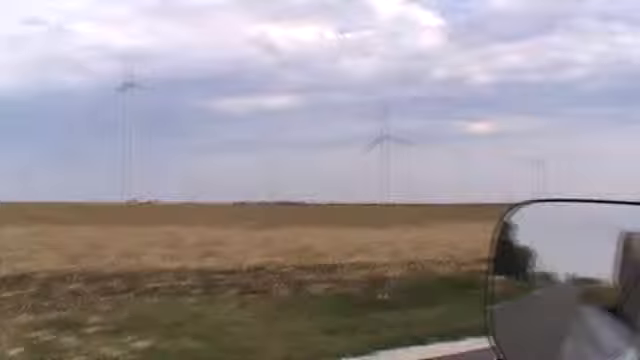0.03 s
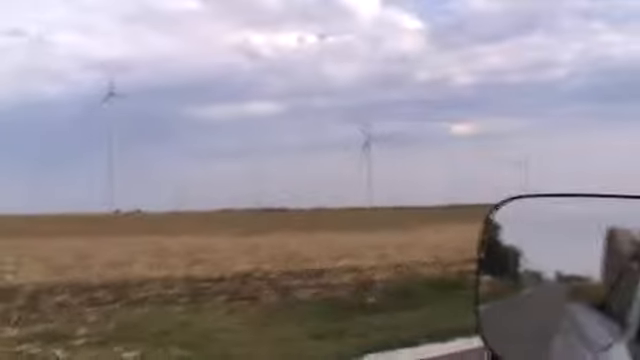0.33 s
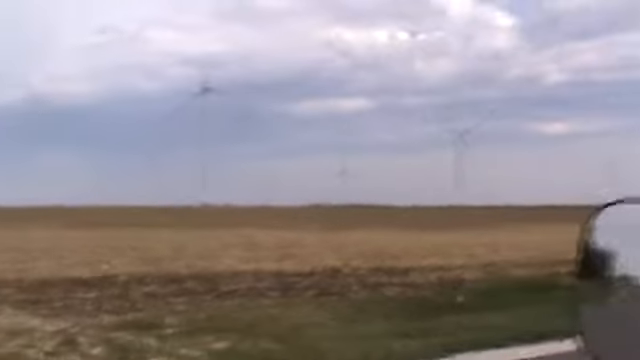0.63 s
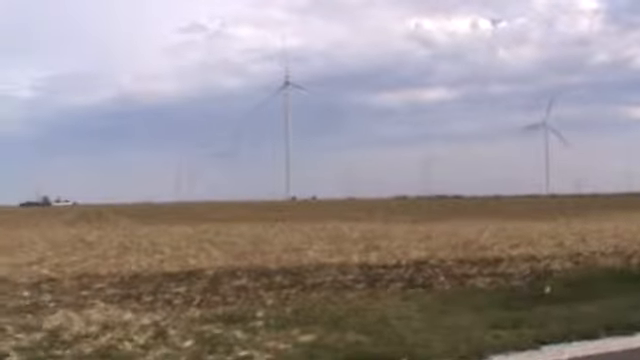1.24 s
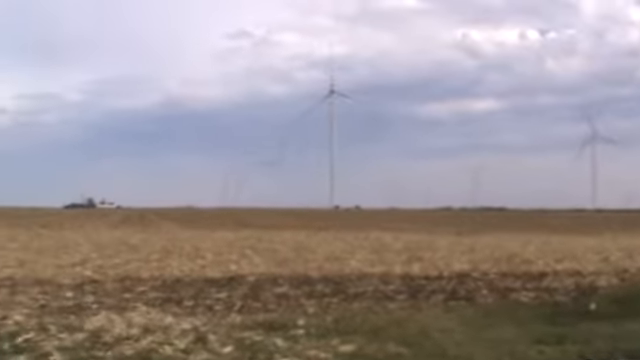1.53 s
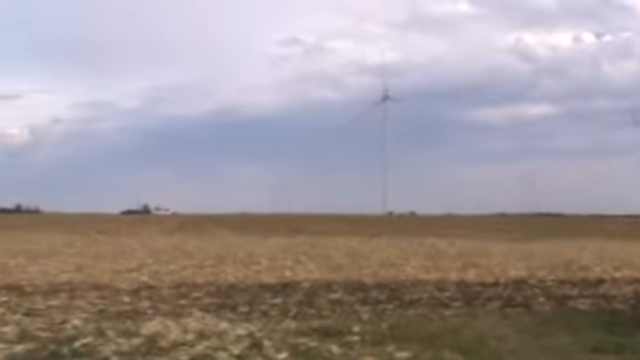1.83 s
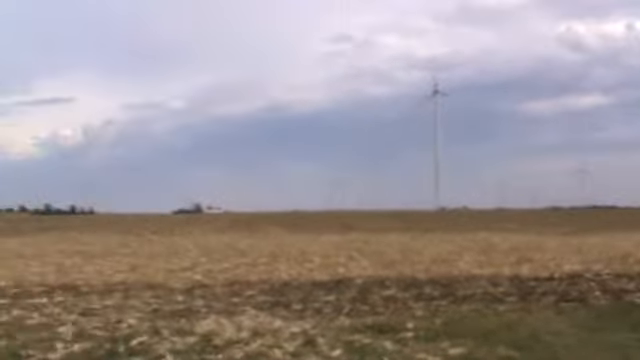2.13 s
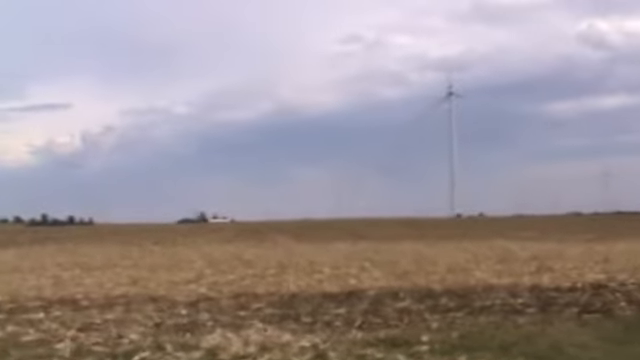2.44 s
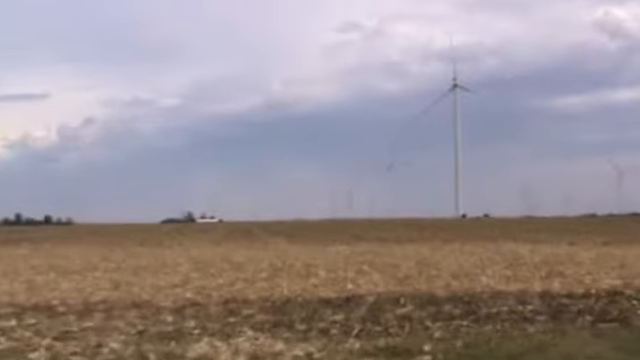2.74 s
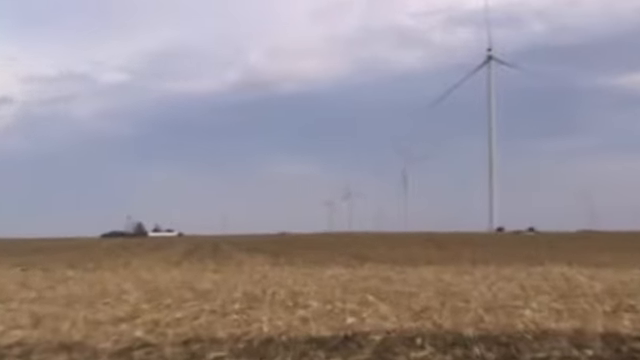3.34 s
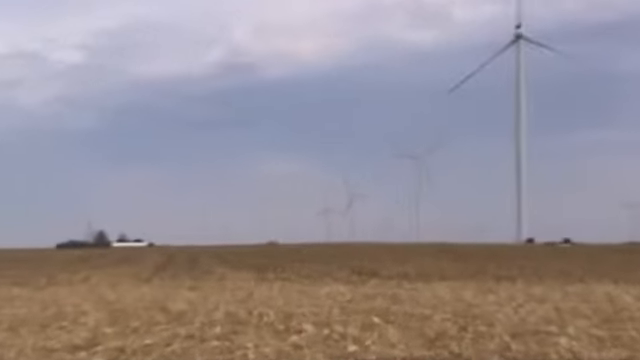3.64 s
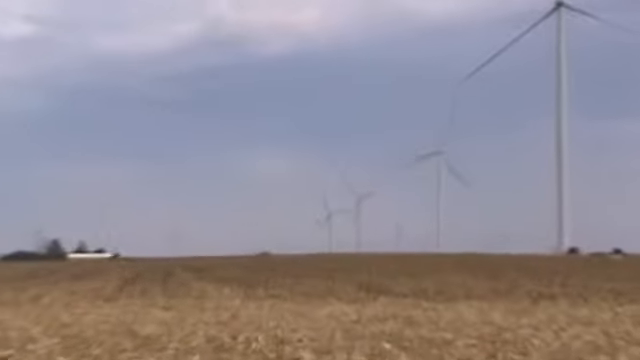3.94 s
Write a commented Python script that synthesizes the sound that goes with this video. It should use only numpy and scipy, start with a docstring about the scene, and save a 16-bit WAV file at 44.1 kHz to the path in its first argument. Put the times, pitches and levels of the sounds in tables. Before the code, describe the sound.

A diesel engine idles close by from about 0.2 seconds to the end, with a low throb, rhythmic clatter, a tinny rattle and cab rumble. Faint, high crickets buzz over a soft hiss. A hand rubs lightly on the microphone early on, and a small plastic part clicks sharply at 0.8 seconds. Short wind buffets hit mostly from 1.7 to 4 seconds, strongest near 3.2.

```python
"""At a roadside, with the microphone at the open cab window, a six-cylinder diesel idles close by.
Exhaust pulses throb under clatter and knocks that repeat each cycle and ring the block; panels drone,
a loose tinny part rattles and the cab rumbles. Out in the field a few bush crickets buzz their wings
over a faint hiss. Wind buffets the microphone, a hand rubs on the camera and a small part clicks."""
import sys
import numpy as np
from scipy import signal
from scipy.fft import rfft, irfft
from scipy.io import wavfile
from scipy.ndimage import uniform_filter1d

SR = 44100
rng = np.random.default_rng(int(sys.argv[2]) if len(sys.argv) > 2 else 0)


def to_wav(s):
    """Save 16-bit WAV."""
    ch = np.atleast_2d(s).T  # columns
    pcm = np.round(np.clip(ch, -1, 1) * 32767)  # PCM
    wavfile.write(sys.argv[1], SR, pcm.astype(np.int16))


N = 176400
T = np.arange(N) / SR
FREQS = np.maximum(np.arange(N // 2 + 1) * SR / N, 1)

FIRING_HZ, CYLINDERS = 32.021, 6
CLATTER_LAG_S, CLATTER_RISE_S, CLATTER_DECAY_S = 0.017, 0.0086, 0.013
MIDDLE_REPEAT, TREBLE_REPEAT = .7, .3  # share of the noise power that comes back every cycle

# The idle sags a little and recovers. Each row: time in seconds, lateness of the firings in seconds.
IDLE_LAG = [(.25, -.0022), (1.9, 0), (2.55, -.0001), (3.25, -.0011), (4, -.0013)]
# Exhaust throb. Each row: multiple of the firing rate, level in dB.
EXHAUST_HARMONICS = [(1, -28.5), (2, -29.5), (3, -43), (4, -53.5), (6, -54), (7, -41.5)]
# Clatter of the cylinders in firing order. Each row: midrange gain in dB, treble gain in dB.
CYLINDER_GAINS = [(-5, -5), (-3.5, -7), (-4.5, -7.5), (-5, -28), (-5, -4), (-4, -11.5)]
# Tone of the clatter. Each row: frequency in Hz, gain in dB.
CLATTER_COLOUR = [(200, -12), (320, -4), (500, -5), (800, -2.5), (1100, -4), (1450, -2.5), (1750, -7.5),
                  (2100, -7.5), (2450, -8), (2900, -13), (3700, -23.5), (7000, -37.5)]
# Ringing of block and panels. Each row: frequency in Hz, width in Hz, gain in dB.
BLOCK_MODES = [(347, 10, -1), (416, 13, -4), (468, 20, -6), (625, 24, -3), (787, 34, -4), (854, 14, -5),
               (930, 22, -5), (983, 20, -8), (1085, 28, -8), (1282, 16, -7), (1402, 26, -3),
               (1602, 16, -10), (1921, 24, -8), (2375, 70, -14)]
# Knocks. Each row: seconds into the cycle, level in dB, centre in Hz, width as a share of the centre.
KNOCKS = [(.0195, -22, 1400, .9), (.0188, -14.5, 880, .5), (.0246, -16, 830, .9), (.0352, -22, 740, .9),
          (.0543, -11.5, 840, 1.3), (.0808, -14, 810, .75), (.0857, -16, 780, .9), (.091, -22, 980, 1),
          (.1135, -20.5, 760, 1.2), (.1163, -21, 790, 1.2), (.145, -23, 660, 1.2), (.177, -19, 1400, .6)]
# Singing panels. Each row: multiple of the firing rate, level in dB.
PANEL_TONES = [(13, -44.5), (17, -45.5), (19, -44.5), (24.33, -44.5), (25.17, -44), (43.67, -47), (60, -50)]
# Rattles of the loose part. Each row: seconds into the cycle, half length in seconds, level in dB.
RATTLE_BURSTS = [(.148, .003, -34), (.156, 0.0061, -34), (.178, .003, -36)]
# Its tinny ring. Each row: frequency in Hz, width in Hz, gain in dB.
RATTLE_MODES = [(2350, 330, -3), (2405, 65, 3.5), (2486, 230, -6), (2744, 160, -5)]
# Rumble of the cab. Each row: frequency in Hz, gain in dB.
CAB_COLOUR = [(25, -14), (60, 2.5), (110, -5.5), (200, -5), (330, -4), (600, -7.5), (1200, -29)]
# Breeze on the microphone. Each row: time in seconds, level in dB.
BREEZE_LEVEL = [(.2, -31.5), (1.2, -31), (1.8, -28.5), (2.5, -29.5), (3.2, -29), (4, -26.5)]
# Short buffets. Each row: time of the peak in seconds, level in dB, half length in seconds.
BUFFETS = [(1.09, -23.5, .035), (1.40, -29, .03), (1.72, -18.5, .025), (1.835, -17.5, .015),
           (1.98, -17.5, .025), (2.148, -13.5, .024), (2.28, -22.5, .025), (2.745, -19.5, .035),
           (2.86, -19.5, .025), (3.0, -24, .02), (3.195, -11.5, .028), (3.25, -20, .02),
           (3.32, -17.5, .022), (3.675, -23, .02), (3.81, -27, .03), (3.937, -15, .016)]
# Tone of the wind at the ports. Each row: frequency in Hz, gain in dB.
WIND_COLOUR = [(20, -1), (45, -2), (90, -1), (165, -0.5), (240, -5.5), (400, -18.5), (800, -29),
               (2000, -59)]
# The hand on the case. Each row: time in seconds, level in dB.
RUB_LEVEL = [(.2, -40.5), (.35, -45), (.5, -47.5), (.63, -41), (.67, -51.5), (.98, -49), (1.08, -61),
             (1.14, -48), (1.4, -54), (2, -60), (4, -59)]
# Tone of rubs and cracks on the case. Each row: frequency in Hz, gain in dB.
CASE_COLOUR = [(2000, 2), (4000, 4), (5700, 5), (7500, 5), (10000, 0.5), (12000, -7.5), (15500, -18)]
# Clicks. Each row: start in seconds, level in dB, left over right in dB.
CLICKS = [(0.79, -34, 16), (0.7926, -29, 9), (.8, -16, -5), (1.034, -33, -1.5)]
# Ring of the plastic part. Each row: frequency in Hz, gain in dB, seconds to die away by 60 dB.
CLICK_MODES = [(3300, -11, 0.0045), (4650, -19, 0.012), (5430, 3.5, 0.0072), (6891, -24, .012),
               (8240, -6, 0.0081), (8250, -15, 0.012), (12500, -18, 0.0087)]
# Cricket tones. Each row: chirps per second, middle of one chirp in seconds, chirp length in seconds,
# pitch in Hz, sag at both ends in Hz, downward slide per half chirp in Hz, relative level in dB.
CRICKET_CHIRPS = [(16.24, 3.383, .038, 8000, 750, 220, -2.5), (16.24, 3.389, .026, 8600, 700, 0, -5),
                  (15.8, 3.105, .036, 8170, 650, 150, -5.5), (18.05, 3.125, .036, 8500, 550, 0, -6.5),
                  (18.05, 3.125, .022, 8900, 300, 0, -14)]
# All the crickets together. Each row: time in seconds, level in dB.
CRICKET_LEVEL = [(.2, -44), (.5, -49.5), (1, -51.5), (1.6, -51.5), (2.2, -46.5), (3, -47), (4, -46.5)]
# Outdoor hiss. Each row: frequency in Hz, gain in dB.
HISS_COLOUR = [(1500, 14), (3500, 8.5), (5500, 6.5), (6500, 3.5), (8700, 7), (9400, -5), (11000, -9.5),
               (13000, -17), (15500, -44)]


def exhaust(firings, lag_s=0.01672):
    """The exhaust gives one soft pressure pulse for each firing."""
    phase = 2 * np.pi * (firings - lag_s * FIRING_HZ)
    throb = sum(np.sqrt(2) * undb(db) * np.cos(k * phase) for k, db in EXHAUST_HARMONICS)
    return throb * undb(.5 * wander(12)) * pan(lr_db=-1.0)


def clatter_power(firings):
    """Midrange and treble power of the bursts: each firing rises fast and dies away under the next."""
    delayed = firings - CLATTER_LAG_S * FIRING_HZ
    middle, treble = 0, 0
    for back in range(2):
        age = (delayed % 1 + back) / FIRING_HZ
        rise = np.minimum(age / CLATTER_RISE_S, 1)
        burst = rise * np.exp(-np.maximum(age - CLATTER_RISE_S, 0) / CLATTER_DECAY_S)
        cylinder = (np.floor(delayed).astype(int) - back) % CYLINDERS
        gains = undb(CYLINDER_GAINS)[cylinder]
        middle += (burst * gains[:, 0]) ** 2
        treble += (burst * gains[:, 1]) ** 2
    return middle, treble


def clatter(firings, level_db=-29.5, ring_db=-32.5, crossover_hz=1720, bed=0.32):
    """Each firing shakes out a burst of rattling, over a steady bed, and rings block and panels."""
    middle, treble = clatter_power(firings)
    grain = undb(1.45 * wander(360))
    low = stereo(lambda: cyclic_noise(firings, MIDDLE_REPEAT), side_db=-4.5, lr_db=-4.5)
    high = stereo(lambda: cyclic_noise(firings, TREBLE_REPEAT), side_db=-8.0, lr_db=-2.0)
    low *= grain * np.sqrt(middle + bed ** 2)
    high *= grain * np.sqrt(treble + bed ** 2)
    low_share = 1 / (1 + (FREQS / crossover_hz) ** 8)
    shake = irfft(rfft(low) * np.sqrt(low_share) + rfft(high) * np.sqrt(1 - low_share), N)
    drive = stereo(lambda: cyclic_noise(firings, MIDDLE_REPEAT), side_db=-19.5, lr_db=-2.4)
    ring = irfft(rfft(drive * np.sqrt(middle)) * block_response(), N)
    return undb(level_db) * colour(shake, CLATTER_COLOUR) + undb(ring_db) * unit(ring)


def knocks(firings, jitter_s=.0001, scatter_db=.7, ring_db=-13, port_lag_s=0.00013):
    """Injectors and valves knock at fixed places in the cycle and set the block ringing."""
    spectrum = 0
    cycle_starts = np.arange(1, int(firings[-1] / CYLINDERS) + 1) * CYLINDERS
    for at, db, hz, spread in KNOCKS:
        chance = rng.standard_normal((len(cycle_starts), 2))
        times = np.interp(cycle_starts + at * FIRING_HZ, firings, T) + jitter_s * chance[:, 0]
        strengths = undb(db + scatter_db * chance[:, 1]) * (times < T[-1] - CLATTER_DECAY_S)
        blows = np.bincount((times * SR).astype(int), strengths, N)[:N]
        body = resonance(hz, hz * spread) ** 4
        spectrum += rfft(blows) * body / np.abs(body).mean()
    # the knocks reach the microphone's right port first
    left_delay = np.exp(-2j * np.pi * FREQS * port_lag_s * np.array([[1], [0]]))
    ringing = 1 + undb(ring_db) * block_response()
    return irfft(spectrum * left_delay * ringing, N) * pan(lr_db=-0.5)


def block_response(top_hz=3200):
    """Block and panels ring at their resonances, with the treble rolled off."""
    modes = sum(undb(db) * resonance(hz, width) for hz, width, db in BLOCK_MODES)
    return modes / (1 + (FREQS / top_hz) ** 6)


def panel_drone(firings, waver_db=3):
    """Panels sing at a few multiples of the firing rate, each wavering in strength."""
    tones = 0
    for k, db in PANEL_TONES:
        gain = undb(db + waver_db * wander(2.95))
        tones += gain * np.cos(2 * np.pi * (k * firings + rng.random()))
    return np.sqrt(2) * tones * pan(lr_db=1.0)


def loose_part(firings):
    """A loose tinny part rattles in short ringing bursts late in each cycle."""
    cycle_s = firings % CYLINDERS / FIRING_HZ
    bursts = sum(undb(db) * np.exp(-((cycle_s - at) / half) ** 2) for at, half, db in RATTLE_BURSTS)
    tin = sum(undb(db) * np.abs(resonance(hz, width)) ** 3 for hz, width, db in RATTLE_MODES)
    shake = stereo(lambda: cyclic_noise(firings, TREBLE_REPEAT), side_db=-14, lr_db=-3.5)
    return bursts * unit(irfft(rfft(shake) * tin, N))


def cab_rumble(firings, level_db=-30.5):
    """The cab rumbles beside the microphone, wide and steady, partly repeating with the engine."""
    shake = stereo(lambda: cyclic_noise(firings, MIDDLE_REPEAT), side_db=-0.5)
    return undb(level_db) * colour(shake, CAB_COLOUR)


def wind(eddy_db=3, eddy_hz=70, smoothing_s=0.0306):
    """Eddies tumble over the microphone ports; their strength follows the breeze and its buffets."""
    buffet_power = sum(undb(db) ** 2 * np.exp(-((T - at) / half) ** 2) for at, db, half in BUFFETS)
    wind_power = level_curve(BREEZE_LEVEL) ** 2 + buffet_power
    eddies = colour(stereo(noise, side_db=-1.5) * undb(eddy_db * wander(eddy_hz)), WIND_COLOUR)
    eddy_power = uniform_filter1d(np.mean(eddies ** 2, axis=0), int(smoothing_s * SR))
    return eddies * np.sqrt(wind_power / eddy_power)


def handling(crack_db=-2.5, crack_s=0.002):
    """Right at the microphone, skin rubs on the case and a small plastic part clicks."""
    friction = stereo(noise, side_db=-30) * undb(2.0 * wander(250))
    out = level_curve(RUB_LEVEL) * colour(friction, CASE_COLOUR)
    for at, db, lr_db in CLICKS:
        age = np.maximum(T - at, 0)
        ring = sum(undb(mode_db - 60 * age / t60) * np.sin(2 * np.pi * hz * age)
                   for hz, mode_db, t60 in CLICK_MODES)
        crack = undb(crack_db) * colour(noise(), CASE_COLOUR) * np.exp(-age / crack_s) * (T >= at)
        out += undb(db) * (ring + crack) * pan(lr_db)
    return out


def crickets(roughness=0.29, tooth_hz=260):
    """Out in the field, each wing stroke is a slightly rough tone that swells and arches in pitch."""
    chorus = 0
    for rate, at, length, hz, sag, slide, db in CRICKET_CHIRPS:
        from_middle_s = (((T - at) * rate + .5) % 1 - .5) / rate
        stroke = np.clip(from_middle_s / (length / 2), -1, 1)
        pitch_hz = hz - sag * stroke ** 2 - slide * stroke + 40 * wander(12)
        phase = 2 * np.pi * np.cumsum(pitch_hz) / SR
        scrape = wander(tooth_hz) * np.cos(phase) + wander(tooth_hz) * np.sin(phase)
        chirps = (np.cos(phase) + roughness * scrape) * np.cos(np.pi * stroke / 2)
        chorus += undb(db + 0.48 * wander(6.2)) * unit(chirps)
    return unit(chorus) * level_curve(CRICKET_LEVEL) * pan(lr_db=-2.0)


def outdoor_hiss(level_db=-43.5):
    """A faint, steady hiss lies behind everything."""
    return undb(level_db) * colour(stereo(noise, side_db=-8.0), HISS_COLOUR)


def cyclic_noise(firings, share):
    """Noise of which a share comes back with every engine cycle."""
    size = int(CYLINDERS / FIRING_HZ * SR)
    cycle = unit(irfft(np.exp(2j * np.pi * rng.random(size // 2 + 1)), size))
    repeating = np.interp(firings / CYLINDERS * size, np.arange(size), cycle, period=size)
    return np.sqrt(share) * repeating + np.sqrt(1 - share) * noise()


def noise():
    """White noise."""
    return rng.standard_normal(N)


def wander(hz):
    """A random curve of rms 1 that moves at up to about this rate."""
    return unit(np.interp(T * hz * 2, np.arange(8000), rng.standard_normal(8000)))


def colour(x, points):
    """Filter by (Hz, dB) points, falling away beyond both ends, and scale to rms 1."""
    hz, db = np.array(points).T
    ends = np.minimum(FREQS / hz[0], 1) ** 2 * np.minimum(hz[-1] / FREQS, 1) ** 2
    gain = undb(np.interp(np.log(FREQS), np.log(hz), db))
    return unit(irfft(rfft(x) * ends * gain, N))


def resonance(hz, width):
    """Response of one resonance, gain 1 at its centre."""
    return 1 / (1 + 1j * (FREQS ** 2 - hz ** 2) / (FREQS * width))


def stereo(make, side_db, lr_db=0):
    """A mid-side pair from two draws of a source, turned into left and right."""
    return unit(make() + undb(side_db) * make() * np.array([[1], [-1]])) * pan(lr_db)


def pan(lr_db):
    """Channel gains with the left lr_db above the right."""
    return undb(np.array([[lr_db], [-lr_db]]) / 2)


def level_curve(rows):
    """Gain along (s, dB) points."""
    return undb(np.interp(T, *np.array(rows).T))


def undb(db):
    """Decibels to gain."""
    return 10 ** (np.asarray(db) / 20)


def unit(x):
    """Scale to rms 1."""
    return x / np.sqrt(np.mean(x ** 2))


def scene():
    """Engine, cab, field, wind and hand as they meet at the window."""
    firings = FIRING_HZ * (T - np.interp(T, *np.array(IDLE_LAG).T))  # running count of firings
    background = cab_rumble(firings) + outdoor_hiss()
    engine = exhaust(firings) + clatter(firings) + knocks(firings)
    bodywork = panel_drone(firings) + loose_part(firings)
    return engine + bodywork + background + crickets() + wind() + handling()


def record(dry, start_s=0.1953, fade_s=0.024, top_hz=15500):
    """After a moment of silence the sound fades in quickly; the highest treble is cut."""
    fade_in = np.clip((T - start_s) / fade_s, 0, 1)
    lowpass = signal.ellip(8, .2, 70, top_hz, fs=SR, output="sos")
    return signal.sosfilt(lowpass, dry * fade_in)


dry = scene()
out = record(dry)
to_wav(out)
```